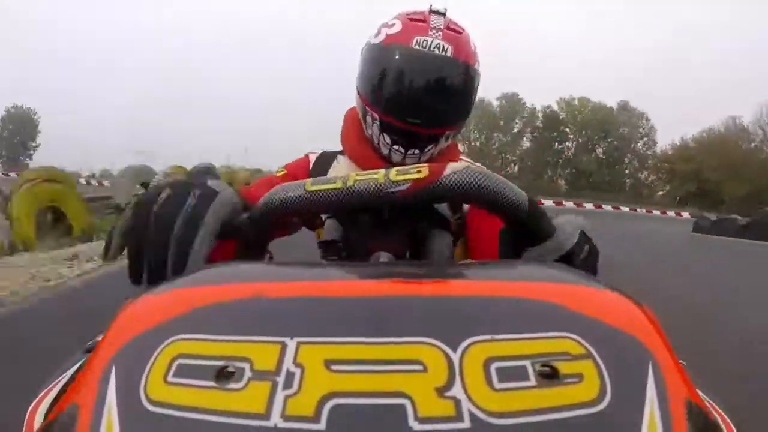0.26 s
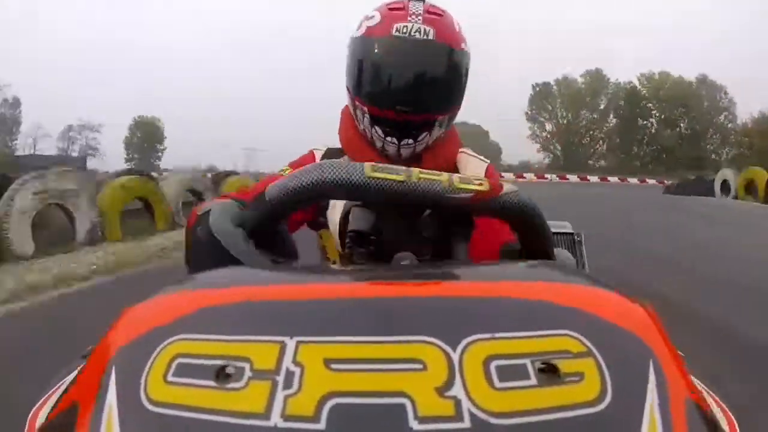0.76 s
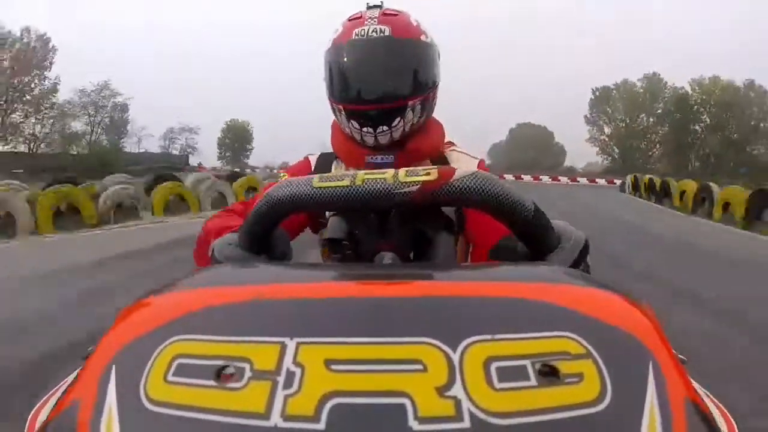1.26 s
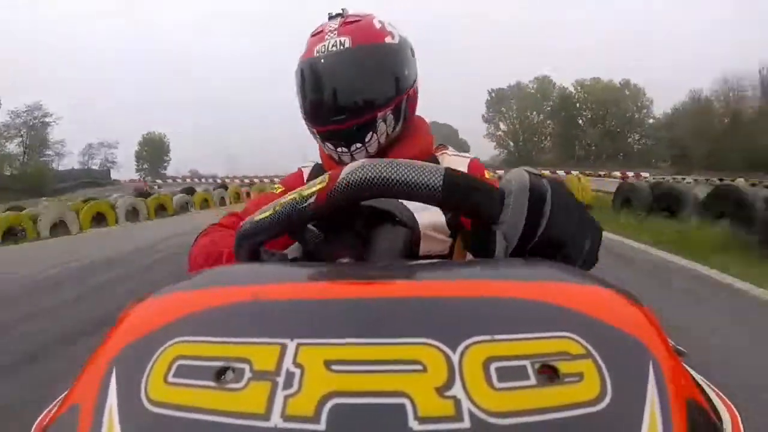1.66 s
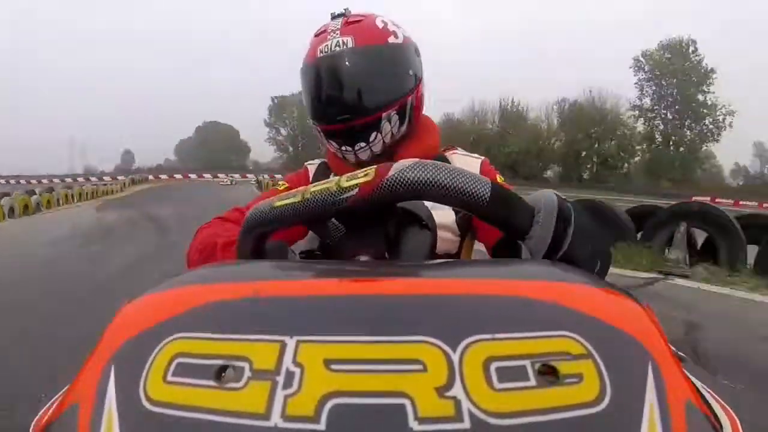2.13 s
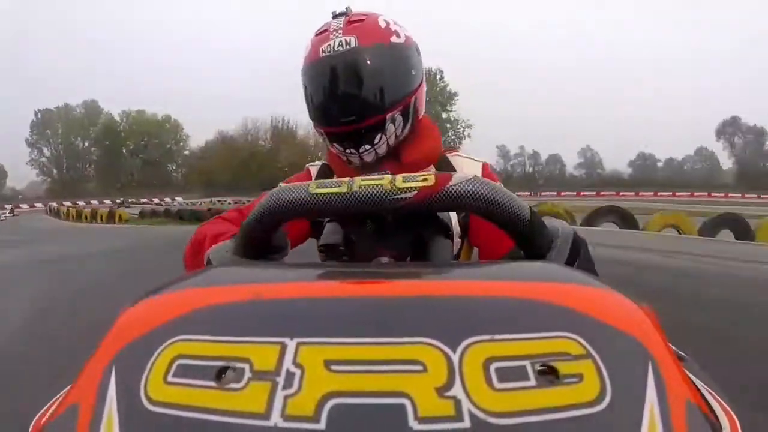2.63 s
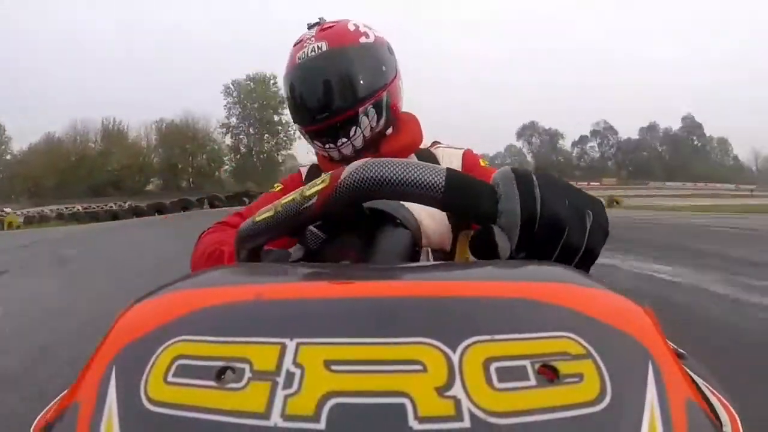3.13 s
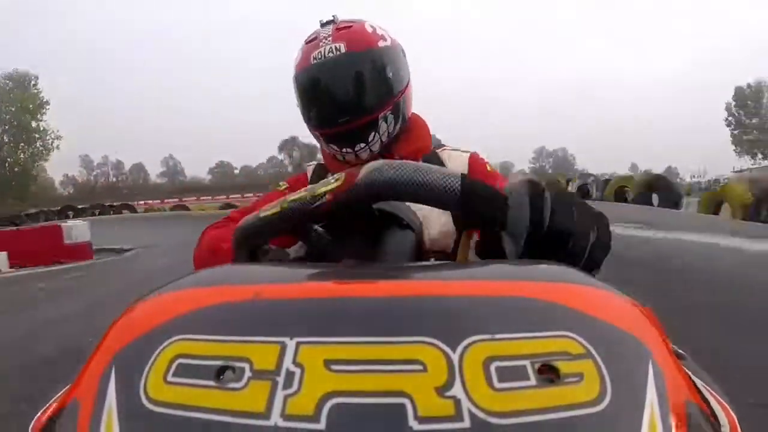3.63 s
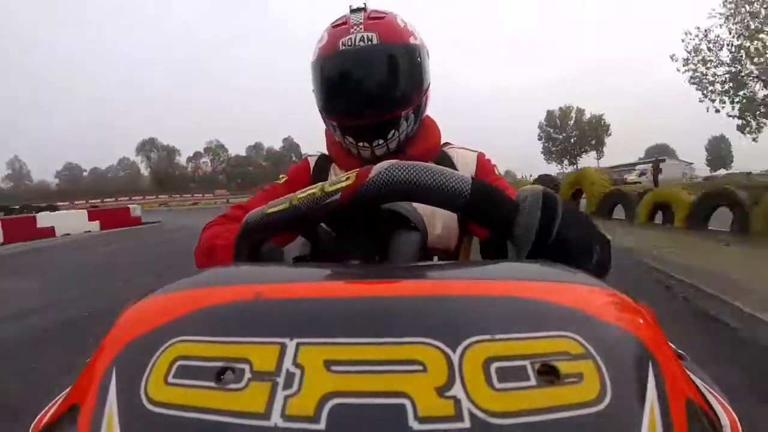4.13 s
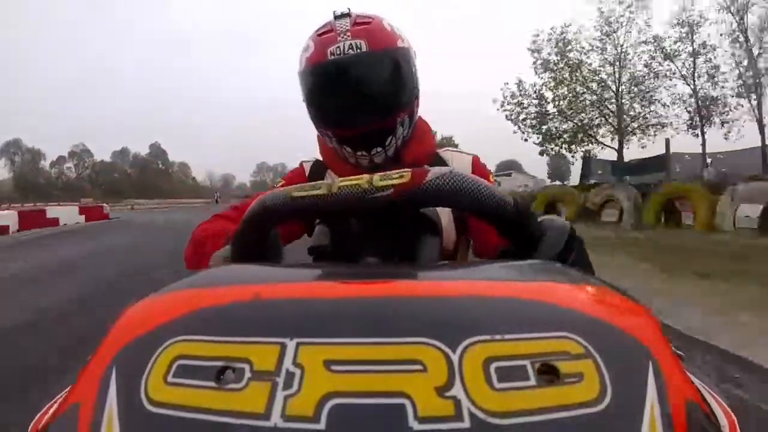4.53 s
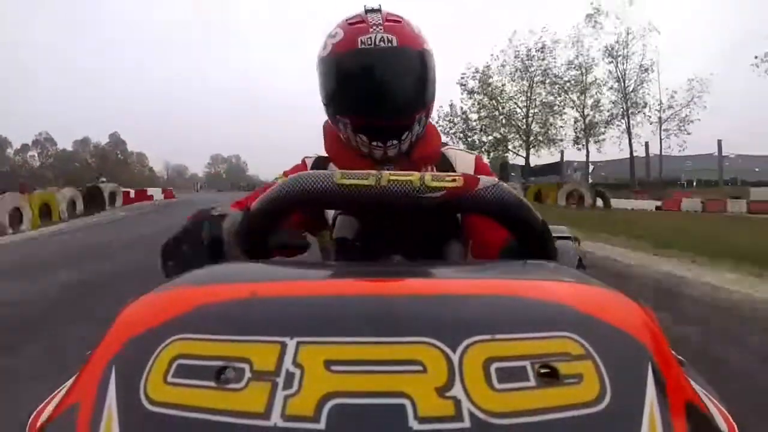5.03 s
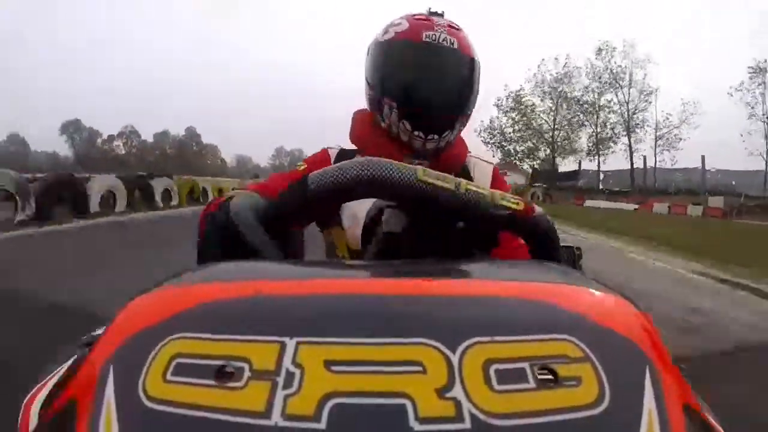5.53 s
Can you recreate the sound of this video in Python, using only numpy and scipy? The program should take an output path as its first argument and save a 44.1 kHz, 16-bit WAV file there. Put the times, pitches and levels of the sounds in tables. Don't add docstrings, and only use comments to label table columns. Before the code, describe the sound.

A close onboard microphone in a closed housing on a two-stroke kart, outdoors, dense and slightly overdriven. From 0 to 0.45 s the engine buzzes high and steady, with frame rattle and two sharp knocks. At about 0.5 s the throttle cuts and pitch drops by about a third; from 0.65 s it pulls up again, wavering, with knocks at 0.75 and 0.9 s. At 1.28 s it lifts: the firing tone fades and pitch slides down until about 2 s, leaving vibration, rattle and airy hiss. Heavy thuds cluster at 2.1-2.3 s. From 2.45 s a low, rough, fluttering growl holds through the corner, with thin faint tyre squeals around 2.9-3.2 and 3.5-3.7 s. After 4 s revs climb, strongest near 5.2 s. A shift drops pitch at 5.3 s, then it revs again unsteadily amid hard knocks at 5.45, 5.55 and 5.7 s. Muffled wind hiss continues throughout.

```python
import sys
import numpy as np
from scipy import signal
from scipy.fft import rfft, irfft, next_fast_len
from scipy.io import wavfile

SR = 44100
rng = np.random.default_rng(int(sys.argv[2]) if len(sys.argv) > 2 else 0)


def generate_wav(sig):
    pcm = np.round(np.clip(np.atleast_2d(sig).T, -1, 1) * 32767).astype(np.int16)
    wavfile.write(sys.argv[1], SR, pcm)


def nominal_scale(level):
    x = np.asarray(level, float) / 20
    return 10 ** x


N = 254883


def evened(x):
    return x / np.sqrt(np.mean(x ** 2) + 1e-20)


def curves(rows):
    s, *columns = np.transpose(rows)
    return [np.interp(np.arange(N) / SR, s, c) for c in columns]


def read(points, hz):
    f, value = np.transpose(points)
    return np.interp(np.log(hz + 1), np.log(f + 1), value)


def drift(hz):
    knot_rate = 400
    knots = rng.standard_normal(knot_rate * 8)
    pole = np.exp(-2 * np.pi * hz / knot_rate)
    slow = signal.filtfilt([1 - pole], [1, -pole], knots)[knot_rate:-knot_rate]
    return np.interp(np.arange(N) * knot_rate / SR, np.arange(len(slow)), evened(slow))


def hump(middle, length):
    return np.cos(np.pi * np.clip((np.arange(N) / SR - middle) / length, -.5, .5)) ** 2


def swell(rows):
    return sum(db * hump(s, length) for s, length, db in rows)


def beat(crest, hz):
    return np.cos(2 * np.pi * hz * (np.arange(N) / SR - crest))


def coloured(x, points):
    size = next_fast_len(N)
    gain = nominal_scale(read(points, np.fft.rfftfreq(size, 1 / SR)))
    return evened(irfft(rfft(x, size) * gain, size)[:N])


def resonate(x, hz, width):
    pole = np.exp((-np.pi * width + 2j * np.pi * hz) / SR)
    return 2 * signal.lfilter([1 - abs(pole)], [1, -pole], x).real


def body(x, modes):
    total = 0
    for hz, width, db in modes:
        once = resonate(x, hz, 0.96 * width)
        total = total + nominal_scale(db) * evened(resonate(once, hz, 0.96 * width))
    return evened(total)


def layer(drive, quiet_db, load_db, jolt_db, speed_db):
    load, jolt, speed = drive
    return nominal_scale(quiet_db + load_db * load + jolt_db * jolt + speed_db * speed)


def crank():
    # time in seconds, turns a second in Hz.
    speed = [(0.0, 244.2), (0.465, 243.2), (0.615, 171.2), (0.95, 205.2), (1.27, 218.5), (1.29, 205.8),
             (1.788, 173.0), (1.998, 144.8), (2.345, 141.8), (2.74, 133.8), (3.425, 146.0), (4.005, 141.0),
             (4.407, 154.0), (4.805, 172.0), (5.27, 210.0), (5.379, 165.0), (5.587, 200.0), (5.78, 210.2)]
    # a crest in seconds, length in seconds, rate in Hz, swing in Hz
    surges = [(0.094, 0.26, 6.1, 3.1), (0.316, 0.53, 1.7, -3.5), (0.796, 0.96, 7.7, 8.0),
              (1.598, 0.42, 7.8, -3.0), (2.153, 0.25, 13.0, -3.9), (2.54, 0.53, 7.8, 2.0),
              (3.024, 0.86, 1.4, -2.4), (3.29, 0.42, 12.6, 1.3), (3.638, 0.76, 3.4, -2.0),
              (3.816, 0.52, 5.1, 2.5), (4.936, 0.89, 8.2, 2.0), (5.678, 0.8, 5.6, -23)]
    surge = sum(swing * hump(s, length) * beat(s, rate) for s, length, rate, swing in surges)
    hz = (curves(speed)[0] + surge) * (1 + .003 * drift(18))
    return hz, np.cumsum(hz) / SR


def throttle():
    # from and to in seconds, load at the start and at the end from 0 to 1,
    # time the gas lingers in seconds.
    pulls = [
        (-.1, .465, 1, 1, .11),
        (.635, 1.28, .72, .95, .12),
        (2.45, 5.255, .93, 1, .035),
        (5.378, 5.9, .9, .76, .1),
    ]
    open_s, shut_s = .04, .025
    t = np.arange(N) / SR
    load, flow = np.zeros(N), np.zeros(N)
    for a, b, first, last, late_s in pulls:
        load += np.interp(t, [a, a + open_s, b, b + shut_s], [0, first, last, 0])
        flow += np.interp(t, [a, a + open_s, b, b + late_s], [0, first, last, 0])
    return load, flow


def road_jolt():
    # time in seconds, jolt from 0 to 1.
    jolt = [(0, 1), (.45, 1), (.6, 0.31), (1.15, 0.61), (1.27, 0.8), (1.4, 0.62), (2.05, 0.3), (2.25, 0.61),
            (2.88, 0.22), (3., 0.86), (3.45, 1), (3.9, 0.9), (4.3, 0.88), (4.55, 0.39), (5., 0.45),
            (5.25, 0.9), (5.4, 0.37), (5.6, 0.71)]
    return curves(jolt)[0]


def hiss(turns, drive):
    # frequency in Hz, level in dB.
    housing = [(1200, -23), (2000, -3.5), (3000, -10), (3800, -14.5), (4450, -14.5), (4850, -9),
               (5600, -8.5), (6500, -12.5), (7600, -17.5), (8600, -22), (9600, -26), (12000, -60)]
    chop = 1 + 0.033 * np.cos(2 * np.pi * turns)
    flutter = nominal_scale(0.29 * drift(60) + 0.2 * drift(27))
    air = coloured(chop * flutter * rng.standard_normal(N), housing)
    gusts = nominal_scale(6 + 1.2 * drift(8.9))
    return layer(drive, -48.5, 4.5, 6.5, 0.5) * gusts * air


def squeals():
    # middle in seconds, length in seconds, pitch in Hz, level in dB.
    slips = [
        (2.94, 0.14, 5740, -41),
        (3.067, 0.12, 4900, -39),
        (3.185, .12, 4900, -44),
        (3.52, .16, 4950, -39),
        (3.66, 0.26, 5830, -51),
    ]
    width_hz = 83
    out = np.zeros(N)
    scrub = rng.standard_normal((len(slips), SR // 4))
    for (s, length, hz, db), noise in zip(slips, scrub):
        size = round(length * SR)
        tone = body(noise, [(hz, width_hz, 0)])[:size]
        out[round(s * SR) - size // 2:][:len(tone)] += nominal_scale(db) * np.hanning(len(tone)) * tone
    return out


def road(drive):
    # frequency in Hz, width in Hz, level in dB.
    tyres = [(42, 42, -2), (82, 50, 2), (125.6, 110, 3.5)]
    # frequency in Hz, width in Hz, level in dB.
    frame = [(259, 160, -6.5), (379, 25, 0.5), (452, 49, 8), (503, 26, -19)]
    # middle in seconds, length in seconds, swell in dB (below
    bumps = [(.37, 0.11, 1.5), (0.629, 0.36, 13), (2.02, 0.29, -11.5), (2.262, .3, 11), (2.8, 0.22, 16),
             (3.471, 0.13, 4), (3.79, 0.45, 3), (3.969, 0.17, 4.5), (5.313, .12, 15), (5.487, .1, 11),
             (5.645, .18, 9.5)]
    # middle in seconds, length in seconds, swell in dB
    rings = [(.42, 0.21, -3), (1.27, 0.082, 10.5), (2.04, 0.12, -6), (2.62, .08, 2), (2.81, 0.087, 7.5),
             (3.25, 0.42, -3), (3.56, .1, 4), (3.85, 0.092, -12), (4.28, 0.4, 6.5), (5.1, 0.15, 9),
             (5.6, .14, 6)]
    bounce_db = swell(bumps) + 1.1 * drift(5.3)
    lumps = nominal_scale(1.7 * drift(26))
    thump = body(nominal_scale(0.5 * drift(4)) * rng.standard_normal(N), tyres)
    rattle = body(lumps * rng.standard_normal(N), frame)
    thump_level = layer(drive, -28, 0, 10.5, 0) * nominal_scale(bounce_db)
    rattle_level = layer(drive, -28.5, 0, 12, 0.5) * nominal_scale(swell(rings))
    return thump_level * thump + rattle_level * rattle


def knocks():
    # start in seconds, peak in dB, ring in Hz, low thud in dB.
    hits = [(0.031, -11, 1068, -26), (0.149, -6, 453, -32), (0.51, -18, 494, -21), (0.548, -14, 456, -9),
            (0.659, -27, 434, -39), (0.755, -9, 456, -4.5), (0.889, -11.5, 368, -23),
            (0.976, -28, 415, -38), (2.021, -19, 438, -36), (2.12, -15, 440, -24), (2.187, -17, 660, -2),
            (2.223, -13, 380, 1), (2.256, -7.5, 395, 4), (2.359, -26, 437, -19), (2.448, -20, 1020, -37),
            (3.334, -19, 443.5, -30), (3.847, -26, 1090, -24), (5.29, -18.5, 500, -17),
            (5.439, -9, 406, -5), (5.563, -8.5, 434, -28), (5.695, -8, 427, -20)]
    out, t = np.zeros(N + SR), np.arange(4000) / SR

    def dying(hz, fall_s):
        return np.sin(2 * np.pi * hz * t) * nominal_scale(-60 * t / fall_s)

    upper = nominal_scale(1.5) * dying(1080, 0.019)
    tick = nominal_scale(-9.5) * dying(2300, 0.0073)
    onset = np.minimum(t / 0.00057, 1)
    for s, db, hz, thud_db in hits:
        ring = dying(hz, 0.069)
        thud = nominal_scale(thud_db) * dying(58, 0.048)
        out[round(s * SR):][:len(t)] += (nominal_scale(db + 4.5) * (ring + upper + tick) + thud) * onset
    return out[:N]


def exhaust(hz, turns, load, drive):
    # frequency in Hz, level in dB.
    pipe = [(400, -37), (455, -24), (540, -39), (720, -40), (1010, -26), (1130, -26), (1280, -39),
            (1580, -31), (1800, -37), (2170, -37), (2390, -56), (2650, -43), (2960, -45), (3280, -58),
            (3470, -52), (3800, -60), (6500, -64)]
    # crank speed in Hz, gain in dB.
    on_pipe = [(135, -6), (146, -5.5), (158, 1), (200, 1), (218, -1), (245, -4)]
    # crank speed in Hz, gain in dB.
    tune = [(135, 2.5), (158, 5), (168, -2.5), (215, -2.5), (240, 3.5)]
    # frequency in Hz, level in dB.
    puffs = [(300, 4), (560, -1), (800, 3), (1080, 4), (1220, -4), (1380, -14), (2000, -20), (3000, -65.5)]
    # frequency in Hz, level in dB.
    rasp_colour = [(900, -23), (1350, -0.5), (1600, -2.5), (2100, -11), (2400, -13), (2900, -13.5),
                   (3600, -15.5), (4500, -30.5), (6000, -62)]
    # middle in seconds, length in seconds, swell in dB.
    splutters = [(.3, 0.51, 8), (.66, 0.08, 10), (1.28, 0.095, 10), (2.4, 0.31, 9.5), (2.52, 0.064, 3),
                 (3.35, 0.097, 8), (3.54, 0.096, 10.5), (3.85, .08, 11), (4.52, .06, 9), (4.75, 0.12, 8),
                 (5.44, 0.095, 8), (5.7, 0.29, 0.5)]
    bark_db = -25 + (27 + read(on_pipe, hz)) * load
    drone_db = -11 + (11.63 + read(tune, hz)) * load
    tones = np.zeros(N)
    for order in range(3, 32):
        low = np.clip((1400 - order * hz) / 150, 0, 1)
        whine_db = .1 * (hz - 180) * np.clip((order * hz - 1800) / 700, 0, 1)
        fade_db = 2.3 * drift(6)
        load_db = low * drone_db + (1 - low) * bark_db
        level_db = read(pipe, order * hz) + load_db + whine_db + fade_db
        spread = .3 * order ** 2
        tones += nominal_scale(level_db) * np.sqrt(2) * np.cos(2 * np.pi * order * turns - spread)
    port = .5 + np.exp(-(turns % 1) / 0.6)
    gas = port * nominal_scale(2.18 * drift(34)) * rng.standard_normal(N)
    splutter_db = swell(splutters)
    roar_level = layer(drive, -29.5, 0.5, 6.5, 2) * nominal_scale(0.21 * splutter_db)
    rasp_level = layer(drive, -40, 2, 11.5, -6) * nominal_scale(splutter_db)
    roar = roar_level * nominal_scale(5.0) * coloured(gas, puffs)
    rasp = rasp_level * nominal_scale(-8.5) * coloured(gas, rasp_colour)
    return tones + roar + rasp


def shake(hz, turns, load):
    # frequency in Hz, level in dB.
    mount = [(135, -22), (146, -25.5), (156, -14.5), (172, -9.5), (190, -5.5), (205, -9.5), (218, -19),
             (245, -26)]
    # frequency in Hz, level in dB.
    mount_high = [(270, -31.5), (340, -28), (400, -26), (436, -19), (490, -23.5)]
    # a crest in seconds, length in seconds, rate in Hz, depth
    # from 0 to 1 (below 0 for a trough), lift in dB.
    throbs = [(0.329, 0.5, 10.7, 1, 5), (0.696, 0.41, 7.74, 0.75, -3.5), (1.023, 0.25, 5.1, 0.7, -6),
              (1.71, .2, 13, 0, 5), (2.51, 0.59, 8.7, 0.6, 4.5), (2.925, 0.17, 12.5, -.9, 4.5),
              (3.475, 0.48, 9, 0.6, -1.5), (3.886, 0.67, 9.2, 0.5, 6), (4.375, .5, 13.1, .95, 6),
              (4.59, .4, 13.6, .75, 2), (5.332, .24, 5.4, .8, -4), (5.623, 0.093, 6.4, -.85, 4.5)]
    throb_gain = np.ones(N)
    for s, length, rate, depth, lift_db in throbs:
        on = np.sqrt(hump(s, length))
        throb_gain = throb_gain * (1 + depth * on * beat(s, rate)) * nominal_scale(lift_db * on)
    first_db = read(mount, hz) + 1.5 * load + 1.4 * drift(29)
    second_db = read(mount_high, 2 * hz) + 3.5 * load + 3.3 * drift(20)
    first = nominal_scale(first_db) * np.cos(2 * np.pi * turns)
    second = nominal_scale(second_db) * np.cos(4 * np.pi * turns + 1.8)
    return np.sqrt(2) * throb_gain * (first + second)


def scene():
    hz, turns = crank()
    load, flow = throttle()
    drive = flow, road_jolt(), (hz - 180) / 100
    engine = shake(hz, turns, load) + exhaust(hz, turns, load, drive)
    return (engine + road(drive) + knocks() + hiss(turns, drive) + squeals())[None]


def low_pass(x):
    return signal.sosfilt(signal.butter(12, 9520, fs=SR, output="sos"), x)


def record(dry):
    thinned = signal.sosfilt(signal.butter(3, 36, "high", fs=SR, output="sos"), dry)
    mix = 0.95 * np.tanh(thinned / 1.34)
    return low_pass(mix)


dry = scene()
out = record(dry)
generate_wav(out)
```